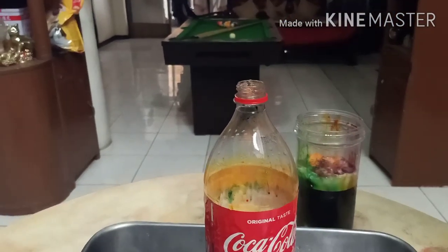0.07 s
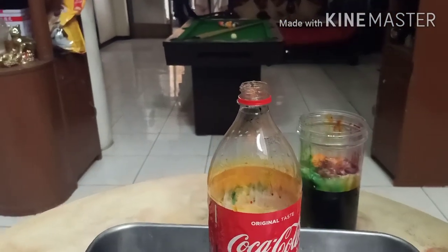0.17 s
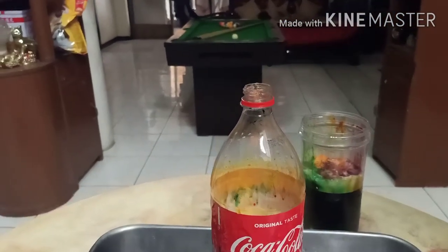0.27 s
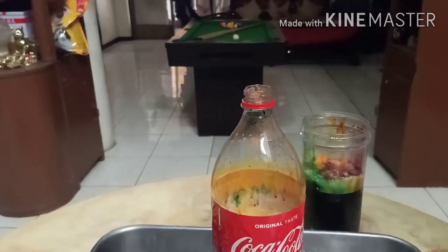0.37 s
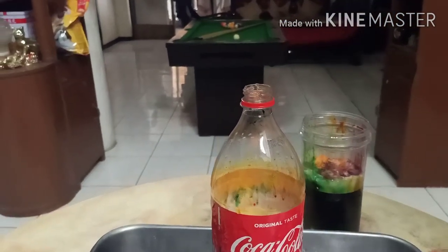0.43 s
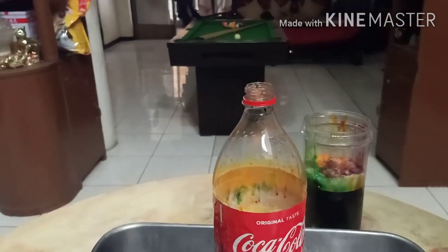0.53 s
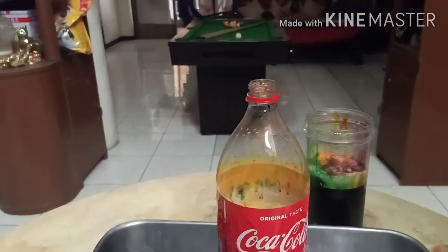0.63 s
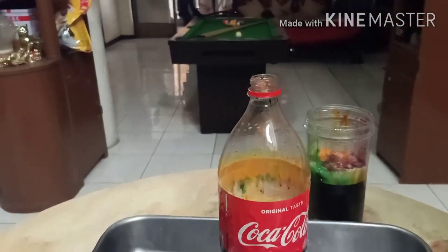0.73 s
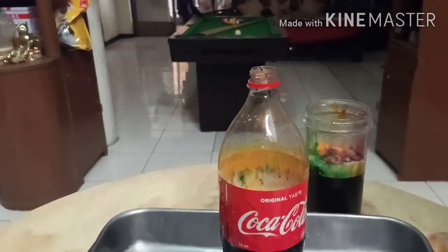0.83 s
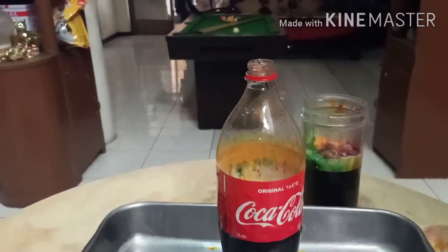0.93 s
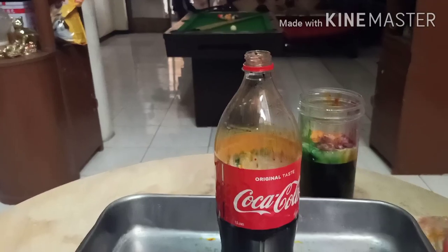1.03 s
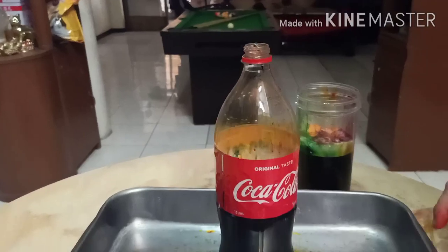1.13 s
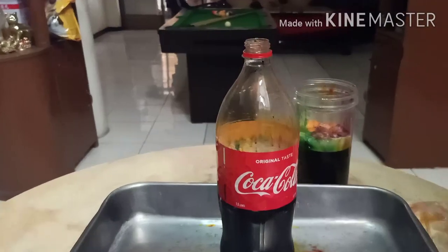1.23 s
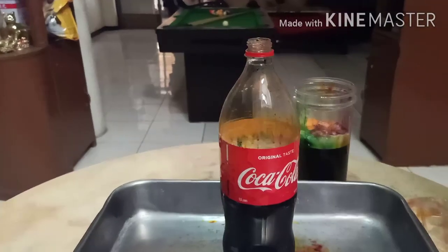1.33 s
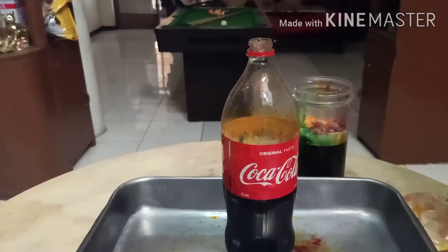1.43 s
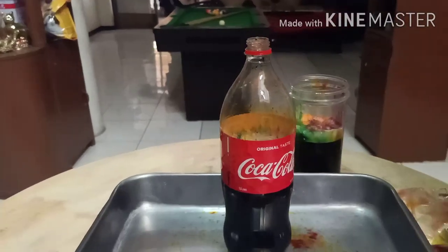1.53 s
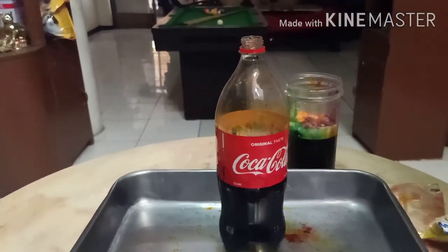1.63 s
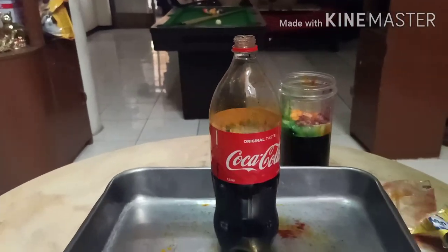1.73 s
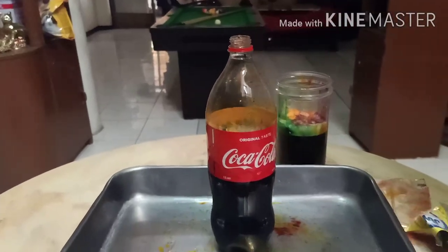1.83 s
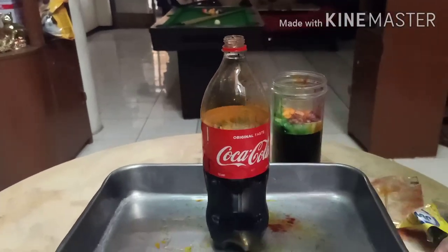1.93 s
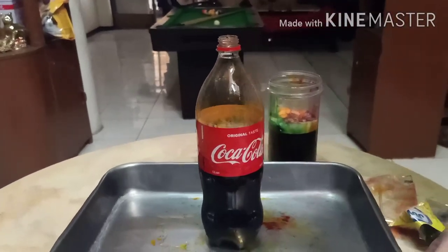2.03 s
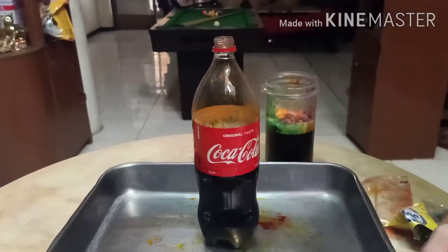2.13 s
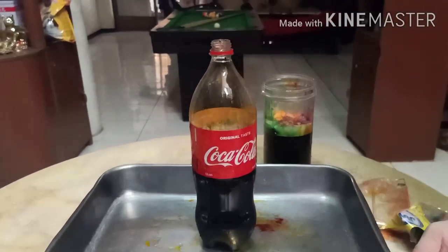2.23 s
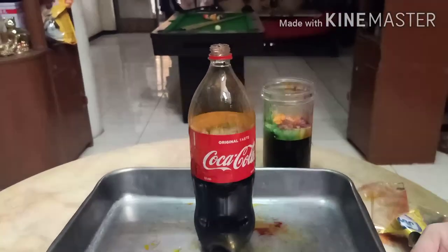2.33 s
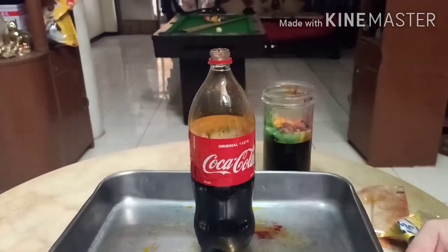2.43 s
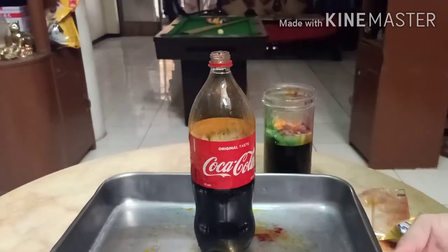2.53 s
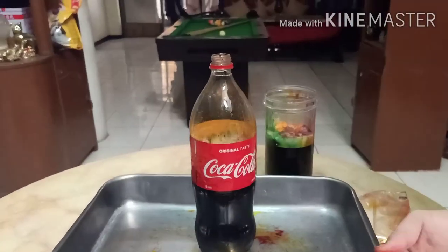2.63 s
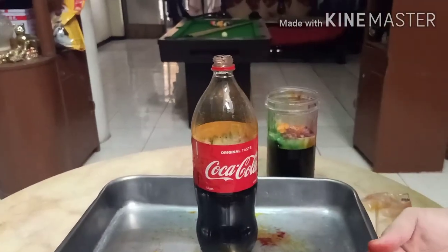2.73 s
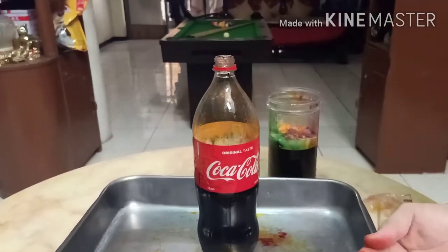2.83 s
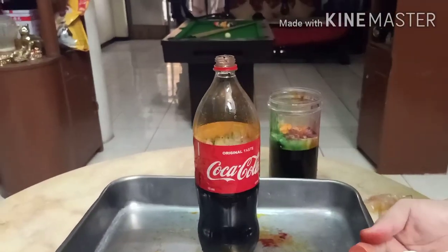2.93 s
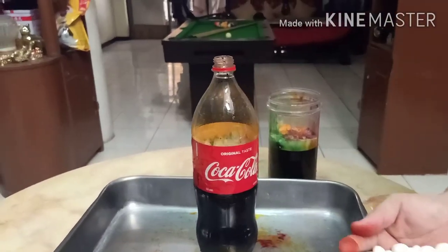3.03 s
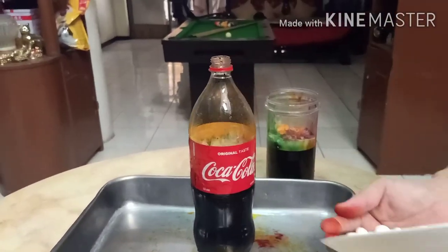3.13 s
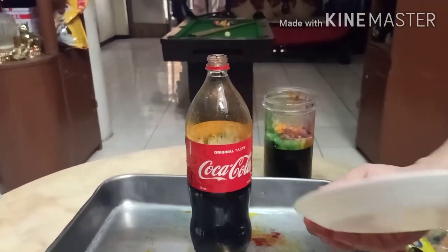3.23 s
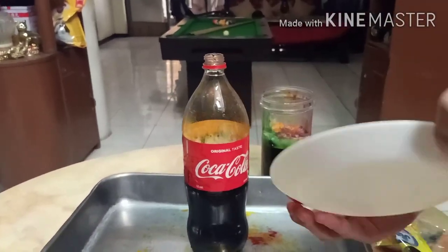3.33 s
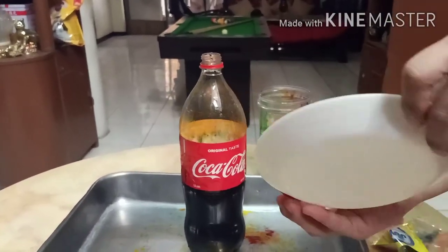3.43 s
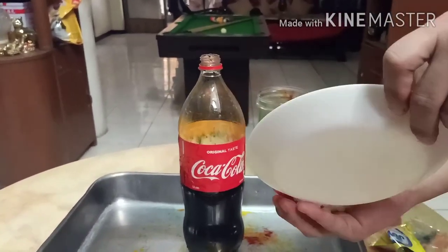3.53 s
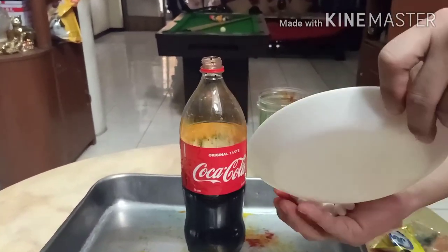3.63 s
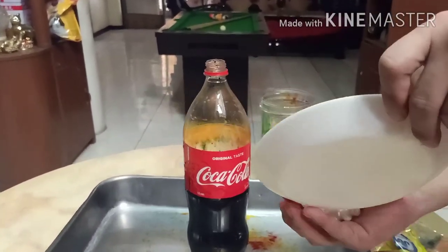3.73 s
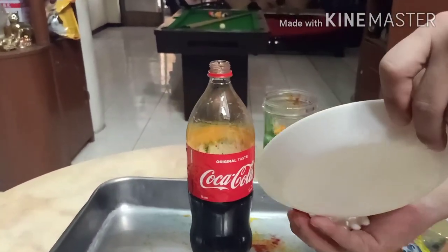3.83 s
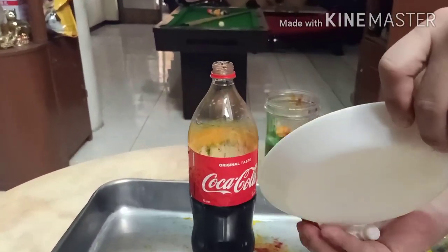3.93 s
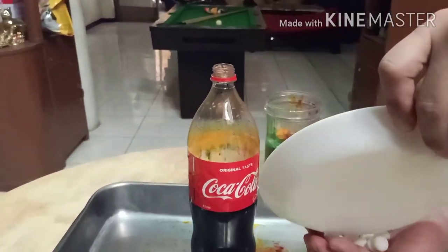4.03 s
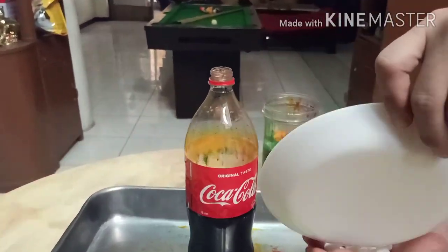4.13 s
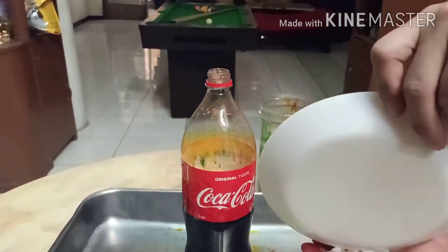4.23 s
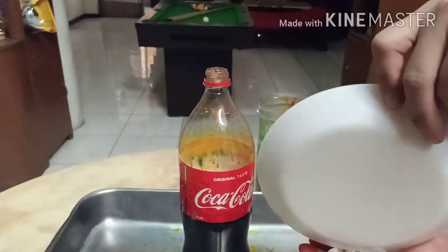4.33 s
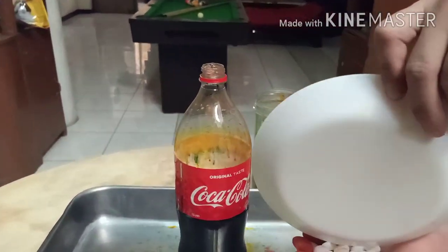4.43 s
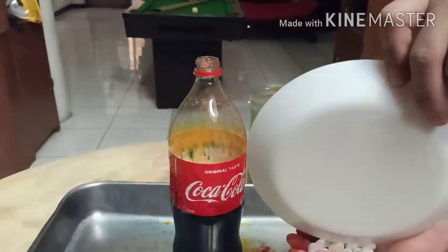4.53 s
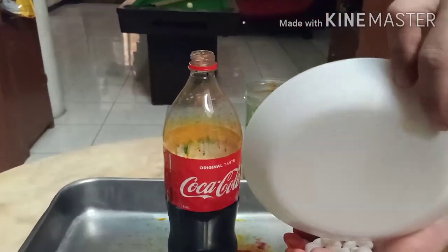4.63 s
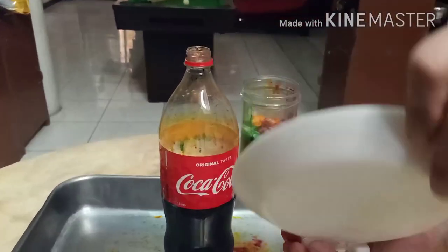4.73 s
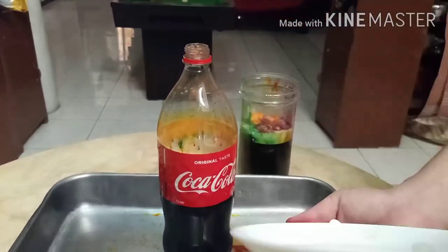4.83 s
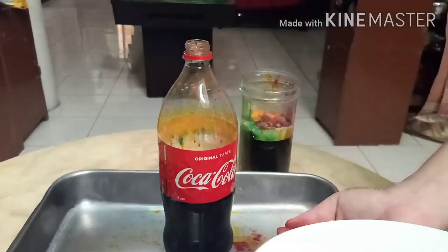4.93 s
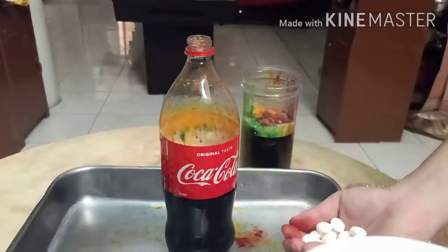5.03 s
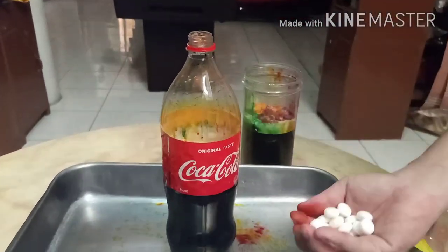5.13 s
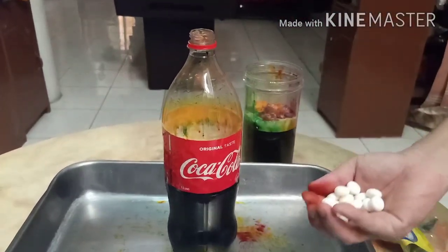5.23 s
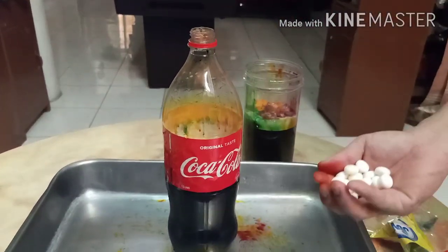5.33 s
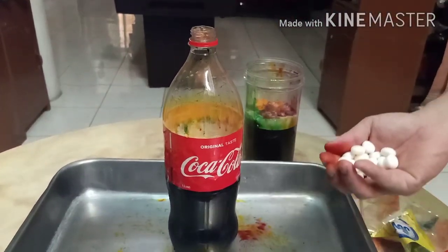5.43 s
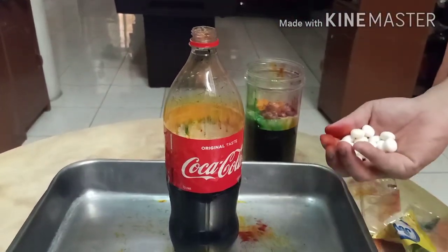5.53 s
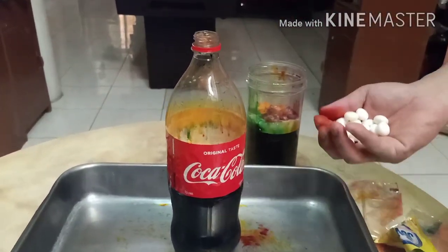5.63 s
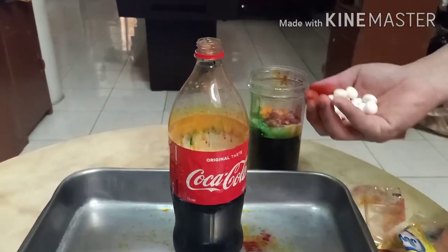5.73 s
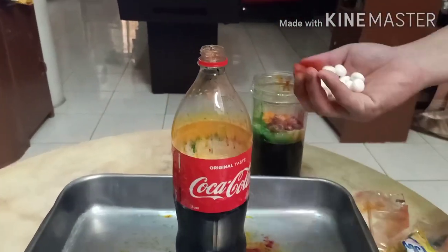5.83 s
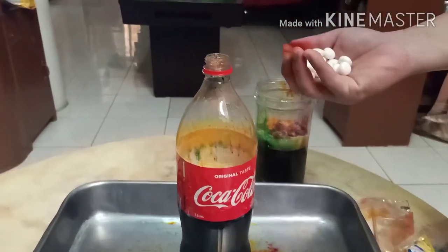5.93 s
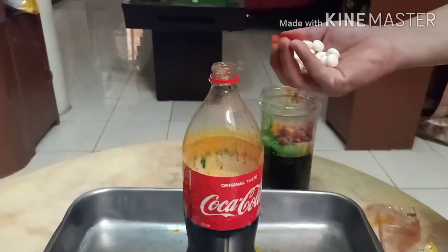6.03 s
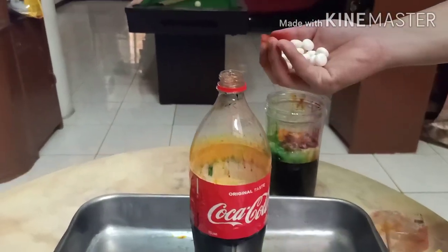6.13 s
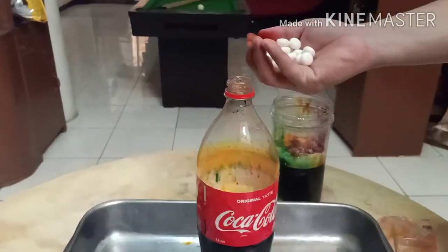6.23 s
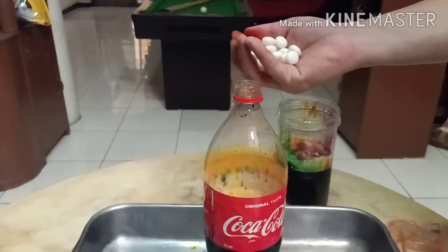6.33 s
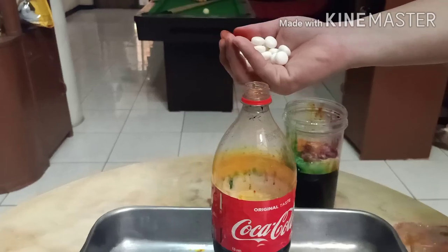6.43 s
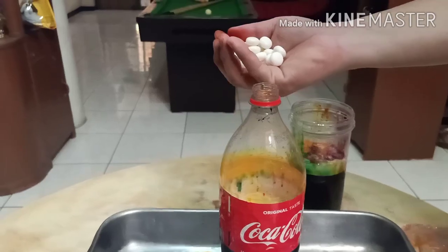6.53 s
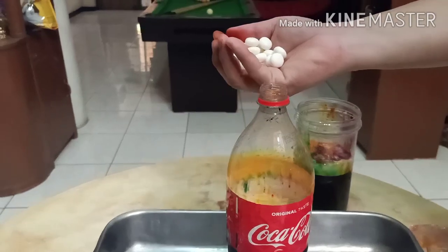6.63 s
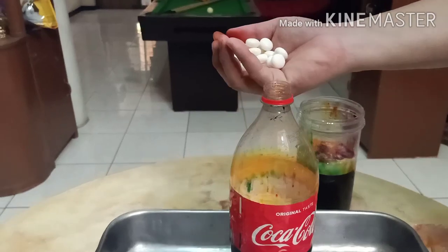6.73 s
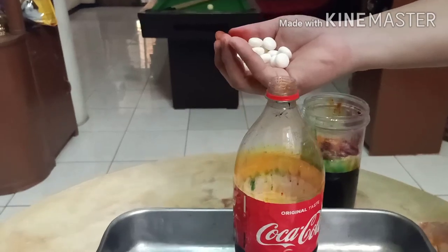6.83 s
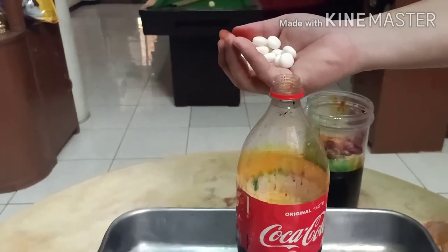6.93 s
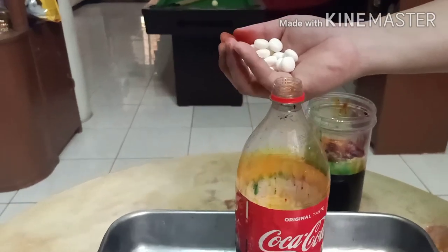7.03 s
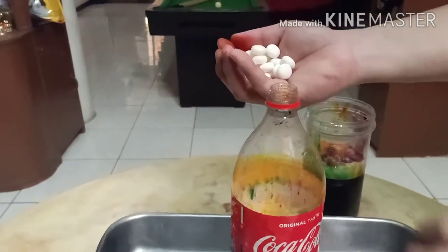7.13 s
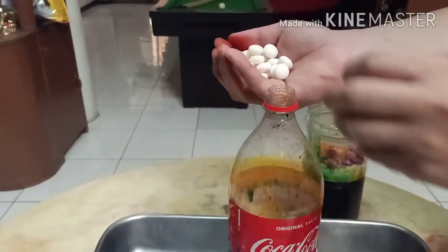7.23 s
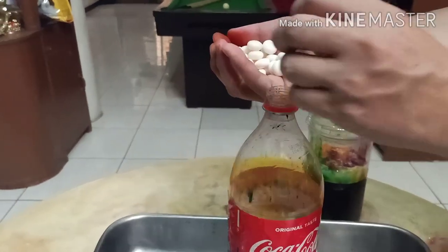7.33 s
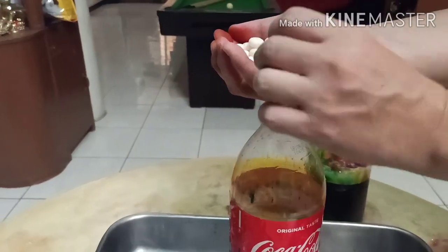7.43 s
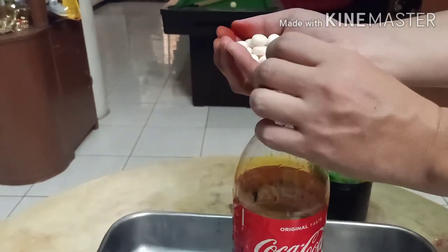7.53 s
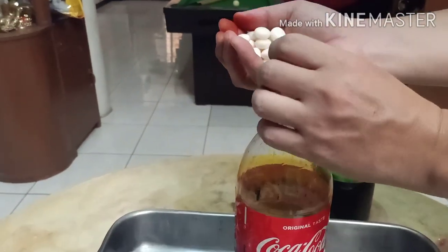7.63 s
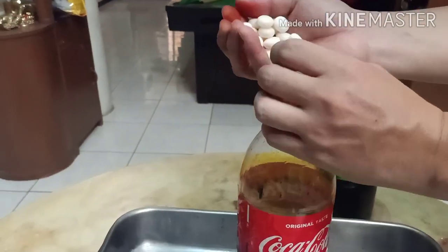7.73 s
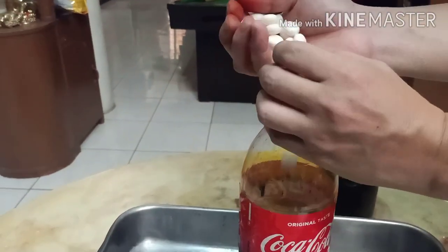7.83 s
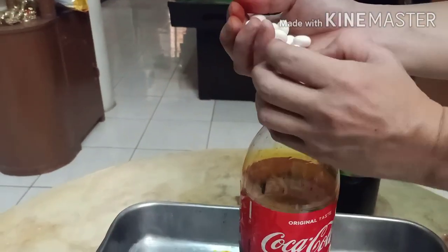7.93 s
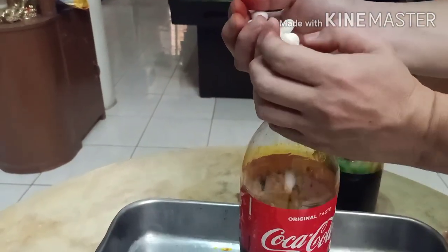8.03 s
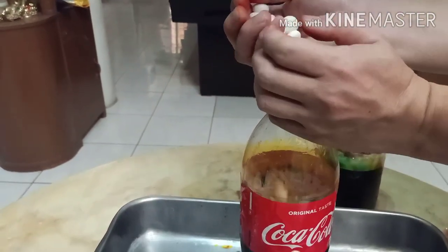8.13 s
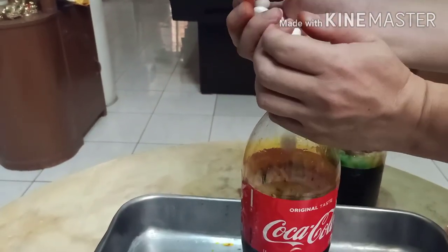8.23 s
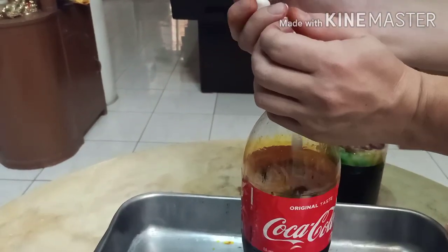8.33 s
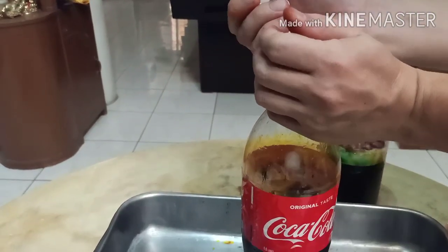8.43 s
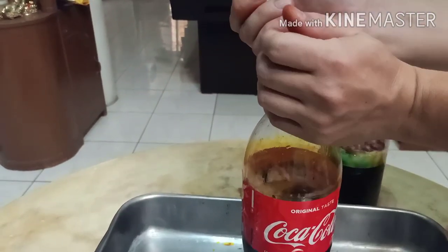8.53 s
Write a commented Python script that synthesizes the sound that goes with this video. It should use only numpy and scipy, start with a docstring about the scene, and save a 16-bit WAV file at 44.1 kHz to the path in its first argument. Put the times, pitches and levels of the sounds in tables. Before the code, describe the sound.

Quiet tiled room with faint air and low hum pulses. A plate scrapes and judders over a tabletop, its hard mints rolling in a dense bright clatter. They are tipped into a hand with sharp clinks; the plate is set down with one loud knock. After a pause, mints clack hollowly into a plastic soda bottle. Close stereo microphone, slightly dull treble.

```python
"""First a low hum swells in short bursts, then a plate of hard mints is drawn over a table.
The mints roll, clink and are tipped into a hand, and the plate is set down with a knock.
Then mints are fed into a plastic soda bottle: they clack on its neck and wall and plop into the soda.
Blows are sums of fading tones plus a burst of noise; rubbing and rolling are streams of tiny impacts.
A tiled room adds echoes and a tail; air noise, rumble, rustle and faint whistles lie behind."""
import sys
import numpy as np
from scipy import signal
from scipy.fft import rfft, irfft, next_fast_len
from scipy.io import wavfile
from scipy.ndimage import uniform_filter1d

SR = 44100
rng = np.random.default_rng(int(sys.argv[2]) if len(sys.argv) > 2 else 0)


def put_to_file(sound):
    """Save the sound as 16-bit audio at rate SR, in the file named by the first command-line argument."""
    columns = np.atleast_2d(sound).T  # one column per channel
    safe = np.clip(columns, -1, 1)
    whole_steps = np.round(safe * 32767)
    wavfile.write(sys.argv[1], SR, whole_steps.astype(np.int16))


N = 377937
TIME = np.arange(N) / SR  # seconds

# In all tables, a positive left-right value is louder on the left; spectrum levels are relative.

# A mint hits the plate: (time [s], peak level [dB], brightness [dB per octave],
# ring length [factor], contact point [0 middle - 1 edge])
CLINKS = [(2.258, -36.5, -2, 0.81, .1), (2.299, -30.5, -1, 0.62, 0.17), (2.304, -29, -0.5, 0.83, 0.39),
          (2.378, -14.5, 5, 2, 0), (2.463, -16, 6, 0.44, .1), (2.482, -37.5, -1.5, 1.1, 1),
          (2.490, -19.5, 1.5, 0.65, 0), (2.499, -15.5, 9.5, .51, 0.49), (2.5, -13.5, 4, 0.87, 0),
          (2.511, -16, 6, 0.66, 0.74), (2.516, -10, 18, 0.35, 0.056), (2.519, -20, 5.5, .4, .3),
          (2.523, -13, 9.5, 0.76, 0.78), (2.532, -13.5, 19, 1.4, 0), (2.561, -18.5, 5, .49, 0.48),
          (2.582, -22, 4.5, 0.81, 0), (2.593, -12.5, 7.5, .8, 0.043), (2.606, -16, 6.5, 0.87, 0),
          (2.626, -22, 3, 0.47, 0.43), (2.633, -18.5, 6.5, 0.54, .3), (2.673, -18.5, 7, 1.2, 0.13),
          (2.678, -19, 3, .9, 0.089), (2.694, -16, -1.5, 1.5, .2), (2.701, -15, 1.5, 1.1, 0.23),
          (2.711, -21.5, 4, .88, 0), (2.719, -13.5, 3, 0.98, 0.015), (2.739, -10, 10, 0.52, .1),
          (2.754, -16.5, 8, .6, 0.081), (2.763, -10.5, 8.5, 0.86, 0.42), (2.771, -13, 9, 0.68, 0),
          (2.783, -16, 3.5, .6, 0.67), (2.798, -11.5, 10.5, 0.55, 0.34), (2.8035, -9, 13.5, .7, 0.37),
          (2.811, -18, 9.5, 0.53, 0.45), (2.822, -21, 12, 0.83, .2), (2.838, -17.5, 2.5, 2.3, 0.28),
          (2.865, -21.5, 3, 0.96, .3), (3.085, -33, -3, 1.3, 0.13), (3.4923, -32, 11, 0.36, 0.34),
          (3.501, -24.5, -2.5, 0.49, 0.85), (3.516, -24, -0.5, 1.4, 0.84), (3.581, -29, 5, 0.36, 0.5),
          (3.607, -20, -3, 0.82, 0.77), (3.635, -19, .5, 0.6, 0.75), (3.661, -22.5, 4, 0.45, 0.52),
          (3.7, -26.5, -3, 1.4, 0.93), (3.784, -24, 5, 0.22, 0.89), (3.9135, -23.5, 12, .3, 0.77),
          (3.922, -13.5, 3, .5, .8), (3.944, -4.5, 4, 0.82, 0.84), (3.9637, -6, 2.5, 0.46, 0.87),
          (3.9675, -14.5, 1, .7, 0.023), (3.971, -13.5, 8.5, 0.67, 0.89), (4.037, -13.5, 7.5, 0.66, 0.89),
          (4.1005, -11.5, 4, .6, 1), (4.12, -29, -0.5, 0.35, 1), (4.175, -19, 1.5, .44, 0.47),
          (4.182, -19, -3, 0.63, 0.87), (4.282, -14, -2.5, 0.59, 0.98), (4.307, -28.5, -5.5, 1.7, 1),
          (4.594, -36.5, -8, 0.21, 0.45), (4.776, -13, 0.5, 1.1, 0.16), (4.7906, -21.5, 2.5, 0.58, 1)]
# The mints move from the left towards the centre as the plate is tipped: (time [s], left-right [dB])
MINTS_PLACE = [(2.3, 10.5), (2.9, 5), (3.6, 1), (3.95, 4), (4.299, 1), (4.8, 4)]
# Mints roll about as the plate is pulled: (time [s], level [dB])
ROLL_LEVEL = [(1.6, -74), (2.2, -64), (2.29, -48), (2.45, -36.5), (2.52, -37), (2.58, -36.5), (2.74, -34),
              (2.86, -43), (2.98, -61)]
# Mints slide off the lifted plate: (time [s], level [dB])
POUR_LEVEL = [(2.98, -64.5), (3.4, -66), (3.5, -50), (3.7, -42), (3.86, -53), (4.05, -68), (4.35, -56),
              (4.5, -77)]
# Tones the plate rings with: (frequency [Hz], level at point 0 [dB], level at point 1 [dB],
# time to fade by 60 dB at ring length 1 [s])
PLATE_MODES = [(622.6, -35, -52.5, 0.24), (1120, -26, -18, 0.024), (1649, -36, -18, 0.12),
               (2393, -32, -19, .08), (2818, -13, -10, 0.095), (2880, -24.5, -10.5, 0.091),
               (3197, -27, -19.5, 0.051), (4123, -18.5, -20, 0.058), (4440, -9.5, -27, 0.056),
               (5236, -14, -8, 0.038), (5534, -17.5, -10.5, 0.039), (5800, -14.5, -13.5, 0.018),
               (6428, -2.5, -4.5, 0.018), (6616, -4.5, -8, 0.04), (6718, 1, -14.5, .037),
               (6970, -5.5, -15, 0.015), (7350, -18, -22, .018), (7870, -11, -14, .023),
               (8470, -14, -33, 0.038), (9560, -12, -23.5, 0.016), (10830, -16.5, -30.5, 0.029),
               (12700, -23, -35.5, 0.03), (14220, -24, -35, .035), (14950, -26, -27.5, .02)]
# Noise burst as a mint meets the plate: (frequency [Hz], density [dB per Hz])
PLATE_CRACK = [(100, -28), (520, -21), (850, -9), (1150, -8), (3000, 4), (3750, -2.5), (4400, -1.5),
               (6800, -3.5), (8300, -10.5), (10000, -17), (15500, -32.5)]

# The plate is drawn over the tabletop: (time [s], level [dB])
SCRAPE_LEVEL = [(1.38, -67.5), (1.62, -57.5), (1.8, -53), (2.2, -60.5), (2.47, -41), (2.515, -29),
                (2.57, -42.5), (2.65, -41), (2.7, -37), (2.81, -35), (2.87, -46.5), (3.0, -54)]
# Spectrum of the scrape: (frequency [Hz], density [dB per Hz])
SCRAPE_COLOUR = [(150, -11.5), (480, -11.5), (780, 2.5), (1150, -1.5), (1600, 2.5), (2100, -1), (2600, 5),
                 (3800, -2), (4600, -3.5), (5800, -4.5), (7200, -8), (9000, -31.5), (15500, -26.5)]
# The plate's foot sticks and slips: (time [s], peak level of a slip [dB])
JUDDER = [(1.794, -32), (1.907, -43), (1.955, -31.5), (1.962, -37), (2.013, -41), (2.03, -36.5),
          (2.067, -40.5), (2.085, -45.5), (2.113, -42.5), (2.139, -46), (2.177, -43), (2.2, -42),
          (2.243, -33)]
# Fine slips ring the foot: (time [s], level [dB])
CREAK_LEVEL = [(1.4, -80), (1.62, -69), (1.75, -50), (1.88, -51.5), (1.95, -60), (2.2, -64.5),
               (2.35, -48.5), (2.45, -71.5)]
# Filter on the creak: (frequency [Hz], gain [dB])
CREAK_COLOUR = [(1400, 2.5), (3000, 12), (4500, -5.5), (7000, -16)]
# Tones of the plate's foot: (frequency [Hz], level at point 0 [dB], level at point 1 [dB],
# time to fade by 60 dB at ring length 1 [s])
FOOT_MODES = [(1360, -17.5, -21.5, 0.046), (2043, -15.5, -1, 0.012), (2873, -14.5, -14.5, 0.023),
              (3070, -16.5, -15, 0.013), (4450, -6, -3.5, 0.0205), (5480, -8, -11.5, 0.02),
              (6755, -8, -9.5, .021)]
# Every judder slip shares: left-right [dB], brightness [dB per octave], ring length factor, contact point
SLIP_PAN_DB, SLIP_BRIGHT, SLIP_LENGTH, SLIP_POINT = 9, 0.5, 0.81, 0.55

# A mint hits the bottle: (time [s], peak level [dB], left-right [dB], brightness [dB per octave],
# ring length [factor], contact point [0 neck - 1 wall])
DROPS = [(7.767, -12.5, 2, 1, 0.84, 0.075), (7.833, -26.5, -3, -6, 2, 1), (8.006, -21, -1, 2, 1.5, 0.088),
         (8.0265, -7, 1, 1.5, 1.13, 0.43), (8.033, -20.5, -2, -14.5, 1.8, 0.34),
         (8.074, -12, 6, 5.5, 1.1, 0.092), (8.1016, 0, 1.5, -1.5, 0.86, 0.12),
         (8.129, -15, 9, 3, 0.61, 0.24), (8.1393, -8, -1.5, 0, 0.95, 0.3),
         (8.154, -14.5, 1, -8, 0.44, 0.54), (8.227, -31, 10, 18, 0.94, .05),
         (8.2605, -14.5, -1, -5, .8, 0.35), (8.287, -12.5, 3, 5, 1.05, 0.8),
         (8.3165, -9.5, -4, 0.5, 0.51, 0.65), (8.328, -14, 1, -8, 1.1, 1), (8.351, -17.5, 16, 1, 0.66, 0.2),
         (8.364, -6, 5, 2.5, 0.7, 0.25), (8.372, -18, 0, -7, 1.8, 0.86),
         (8.390, -15.5, -5, -4.5, 0.45, 0.61), (8.410, -12, 10, 3, 1.15, 0.65),
         (8.542, -12, 4.5, 2, 0.53, 0.54), (8.556, -22.5, 1, 0, 3.3, 0.26)]
# Tones of the bottle: (frequency [Hz], level at point 0 [dB], level at point 1 [dB],
# time to fade by 60 dB at ring length 1 [s])
BOTTLE_MODES = [(697, -10.5, -7, 0.015), (1058, -3, -1, 0.011), (1205, -1.5, 0.5, .01),
                (1400, -7.5, -3, 0.015), (2076, 1.5, -1.5, 0.013), (2260, 5.5, -11, 0.02),
                (3220, -9, -22, .005), (3670, -15.5, -7, 0.0088), (4350, -20, -17.5, 0.011),
                (5000, -21.5, -21, 0.0049), (6160, -30, -32, .006)]
# Noise burst of a hit on the bottle: (frequency [Hz], density [dB per Hz])
BOTTLE_CRACK = [(60, -33), (400, -21.5), (800, -7.5), (2300, 2.5), (3300, -4), (5000, -7), (6800, -13.5),
                (8500, -28.5), (15500, -35)]
# Mints jostle in the bottle's mouth: (time [s], level [dB])
PATTER_LEVEL = [(7.98, -69), (8.04, -58), (8.15, -37.5), (8.24, -58), (8.33, -43), (8.42, -39), (8.5, -56),
                (8.57, -50)]
# Filter on the jostling: (frequency [Hz], gain [dB])
PATTER_COLOUR = [(600, -17.5), (2200, -8), (3300, 2), (6500, 6.5), (9000, -5)]
# Hollow thumps and plops as mints land in the soda: (time [s], peak level [dB],
# starting pitch [Hz], time to fade by 60 dB [s])
PLOPS = [(8.029, -45, 140, 0.27), (8.03, -24, 743, 0.058), (8.188, -44, 82.5, 0.21), (8.279, -48, 104, .15),
         (8.287, -41, 325.4, 0.36), (8.526, -44, 332, 0.57), (8.534, -44, 137, 0.26),
         (8.542, -14.5, 1390, 0.023)]
# A plop builds up over this many cycles; its pitch climbs by this share of itself each second
PLOP_RISE_CYCLES, PLOP_GLIDE_PER_S = 0.75, 0.16

# The plate is set down on the table: (time [s], peak level [dB], left-right [dB],
# brightness [dB per octave], ring length [factor], contact point [0-1])
KNOCKS = [(5.5108, -1, 1, 0.5, 0.45, 0.01), (5.7965, -11.5, 4.5, 2, 0.48, 1),
          (5.8122, -11.5, -0.5, 2.5, 0.26, 1), (5.818, -21, -1, -3, 2.1, 1)]
# Soft bumps further off: (time [s], peak level [dB], left-right [dB],
# brightness [dB per octave], ring length [factor], contact point [0-1])
BUMPS = [(1.4985, -26.5, -5, 0.5, .5, 0), (1.577, -41, 8, -3, 1, 1), (1.588, -39.5, 1, -8.5, 1.1, 0.6),
         (1.795, -33, 0, -3, 1.05, 0.5), (6.919, -28.5, 3, -0.5, 1.7, 1), (6.927, -33.5, 0, -3.5, 2.1, 1),
         (6.943, -24, 1, 4.5, 3.6, 0.95), (6.958, -27.5, 3, 4, 4.5, 1)]
# Tones of the tabletop: (frequency [Hz], level at point 0 [dB], level at point 1 [dB],
# time to fade by 60 dB at ring length 1 [s])
TABLE_MODES = [(80.4, -16.5, -22, 0.67), (141, -19, -27, 0.19), (207, -7.5, -13.5, 0.18),
               (292, -25, -9.5, 0.097), (513, -10.5, 3.5, 0.01), (595, -27.5, 3.5, 0.02),
               (950, -1.5, 8.5, 0.0071), (1260, 16, -9, 0.013), (1470, 1.5, -10.5, 0.013),
               (1630, -8, -17, 0.013), (2120, -16, -5, 0.024), (2910, -35, -21, 0.02),
               (4440, -28, -12, 0.014), (6700, -42, -10, 0.0081)]
# Noise burst of a blow on the table: (frequency [Hz], density [dB per Hz])
TABLE_CRACK = [(40, -37), (130, -29), (400, 7.5), (1200, 5), (2400, -2.5), (3600, -8.5), (7000, -18),
               (8500, -22), (15500, -50)]
# Spectrum of the flat first contact: (frequency [Hz], level [dB])
TABLE_SLAP = [(60, -30), (350, -8), (700, -4.5), (1150, 3.5), (1650, -5.5), (2400, -5), (3600, -27.5),
              (4600, -17.5), (5300, -40), (7000, -27), (9000, -51.5), (15500, -62)]
SLAP_DB, SLAP_FALL_DB = 6.5, 13.5  # strength of the slap at point 0, and its loss towards point 1

# Small dry ticks, such as mints meeting in the palm: (time [s], peak level [dB], left-right [dB],
# brightness [dB per octave], ring length [factor], contact point [0-1])
TICKS = [(1.0225, -40, 10.5, -5, 0.98, 1), (1.042, -26, 7, 12.5, 0.38, 0.57),
         (1.4465, -42, 9, -5, 1.2, 0.5), (1.457, -42.5, 1, -7, 1.1, 0.6),
         (1.527, -35.5, 7, -6.5, 0.54, 0.7), (6.4037, -28, 7.5, 3.5, 0.69, 0.3),
         (6.7764, -19.5, 6.5, 2.5, 0.73, 0.22), (8.061, -30, -3, 12, 0.68, 0.5),
         (8.244, -35, 7, 1, 0.46, 0.1), (8.281, -35, 0, 6, 0.48, 0.4), (8.402, -16.5, 1, -6, 0.82, 0)]
# Tones of a mint: (frequency [Hz], level at point 0 [dB], level at point 1 [dB],
# time to fade by 60 dB at ring length 1 [s])
MINT_MODES = [(2550, -12, 25, 0.035), (3400, -6, -6, 0.007), (4400, -48, 22, 0.018), (5100, -5, -34, 0.033),
              (6820, 8.5, -15.5, 0.027), (10340, -36, 15, 0.021), (14200, -36, 25, 0.034)]
# Fingers rub the mints together: (time of the peak [s], peak level [dB], rise [s], fall [s])
RUBS = [(1.09, -66.5, 0.18, 0.61), (3.79, -39, 0.051, 0.039), (7.94, -46, 0.066, 0.11),
        (8.42, -74, 0.38, 0.64)]
RUB_FADE_DB = -19.5  # change from the peak, one rise before it or one fall after it

# Spectrum of the room air: (frequency [Hz], density [dB per Hz])
AIR_COLOUR = [(25, -33.5), (40, -12), (90, -14), (130, -0.5), (180, -4), (300, -11.5), (450, -12.5),
              (900, -14.5), (1400, -18), (2200, -8), (2900, -16), (3900, -21.5), (7100, -25.5), (8000, -39),
              (16000, -35.5)]
# Loudness of the room air: (time [s], level [dB])
AIR_LEVEL = [(0, -58.5), (1.3, -57), (1.7, -55), (3.2, -53.5), (5.3, -55.5), (6.1, -53.5), (7.2, -52),
             (7.6, -56.5), (8.57, -44)]
# A dull rumble swells: (time [s], level [dB])
RUMBLE_LEVEL = [(0, -60.5), (1.4, -70), (2.4, -85), (3.0, -58.5), (3.8, -51.5), (4.5, -47.5), (5.0, -49.5),
                (5.4, -53.5), (6.1, -51.5), (6.6, -52), (7.4, -55.5), (8.57, -56)]
# Spectrum of the rumble: (frequency [Hz], density [dB per Hz])
RUMBLE_COLOUR = [(25, -30.5), (55, -9.5), (75, -5), (100, -3), (135, 4), (230, -7.5), (330, -6.5),
                 (420, -12.5), (540, -23), (1000, -28.5), (3000, -49)]
# A soft, low rustle while the plate is lifted: (time [s], level [dB])
RUSTLE_LEVEL = [(2.7, -69), (3.1, -55), (3.5, -53.5), (3.85, -48.5), (4.3, -56.5), (4.7, -74.5), (5.3, -62)]
# Spectrum of the rustle: (frequency [Hz], density [dB per Hz])
RUSTLE_COLOUR = [(60, -32.5), (170, -15), (260, -2), (330, 0), (410, -5), (520, -18.5), (1000, -32.5),
                 (3000, -56)]
# The steady part of the low hum: (time [s], level [dB])
HUM_LEVEL = [(0, -78), (2.3, -70.5), (2.8, -57.5), (3.8, -68)]
# The hum swells briefly: (time of the peak [s], level [dB], half length [s])
HUM_SWELLS = [(0.085, -61, 0.019), (0.177, -53, 0.05), (.49, -54, 0.04), (0.737, -47, 0.036),
              (0.905, -55.5, 0.019), (1.154, -49, 0.02), (1.4, -54, 0.017), (1.92, -59, 0.03),
              (2.075, -57, 0.017), (2.18, -53.5, 0.014), (2.602, -54, 0.029), (2.767, -51, 0.037),
              (3.029, -60, .05), (3.27, -50.5, 0.058)]
HUM_HZ, HUM_WANDER_HZ = 131.2, 4.15
# A deep tone in the rumble: (time [s], level [dB])
DRONE_LEVEL = [(4.0, -74), (4.35, -55), (4.58, -47.5), (4.75, -59), (4.9, -58), (5.1, -68)]
# A faint thin tone: (time [s], level [dB])
WHINE_LEVEL = [(4.2, -90), (4.45, -74), (5.0, -78.5), (5.45, -74.5), (5.6, -76)]
# A brief faint whistle: (time [s], level [dB])
CHIRP_LEVEL = [(.95, -71), (1.05, -63), (1.2, -68), (1.28, -70)]

# How long the room's tail lasts: (frequency [Hz], time to fade by 60 dB [s])
ROOM_FADE = [(120, 1), (400, 0.55), (1000, 0.72), (2700, 0.86), (7000, 0.55), (14000, 0.26)]
# Single echoes off floor, ceiling and walls: (delay [ms], relative level [dB])
ECHOES = [(12.5, -11), (18, -21.5), (23.5, -16), (26.5, -22), (30, -11)]
# How alike sound from all sides is at the two microphones: (frequency [Hz], correlation [0-1])
LIKENESS = [(100, 0.95), (300, 0.92), (700, 0.49), (1500, 0.03), (4000, .05)]
EDGE_HZ = 15800  # upper limit of the microphone


def plate():
    """Mints clink on the plate and chatter over it; each contact point rings its own mix of tones."""
    def clink(length, point):
        ring = blow(PLATE_MODES, PLATE_CRACK, crack_db=-9.5, crack_t60=0.027, length=length, point=point,
                    scatter_db=4.5, port_spread=4.1)
        return ring + amp(-15.5) * snap(PLATE_CRACK)

    def graze(length, point):
        return blow(PLATE_MODES, PLATE_CRACK, crack_db=-6.0, crack_t60=0.01, length=length, point=point,
                    scatter_db=4.5, port_spread=2.2, detune=0.0082, size=4096)

    clinks = blows(clink_rows(), clink, pivot_hz=4740, lead_ms=0.16)
    rolling = chatter(lambda: graze(length=0.58, point=0.2), per_s=33, spread_db=3.5, count=8)
    roll = rolling * level(ROLL_LEVEL) * amp([[6.0], [-2.0]])  # gains in dB: left, right
    sliding = chatter(lambda: graze(length=0.6, point=1.0), per_s=330, spread_db=9.5)
    pour = sliding * level(POUR_LEVEL) * amp([[5.0], [1.5]])
    return room(clinks + roll + pour, wet_db=-14.0, near_db=-10.0, echo_db=-7)


def clink_rows():
    """Each clink takes its side from where the mints lie."""
    at, pan_db = np.transpose(MINTS_PLACE)
    return [(s, db, np.interp(s, at, pan_db), bright, length, point)
            for s, db, bright, length, point in CLINKS]


def foot():
    """The plate's foot ring scrapes over the tabletop in fine grains, and creaks and judders as it slips."""
    def slip(length, point):
        return blow(FOOT_MODES, PLATE_CRACK, crack_db=-16.5, crack_t60=0.015, length=length, point=point,
                    detune=0.008, contact_s=0.003, size=4096)

    grit = friction(SCRAPE_COLOUR, per_s=330, spread_db=3.0)
    grit = patchy(grit, depth_db=3.5, patch_s=0.02, patch_hz=500)
    scrape = grit * level(SCRAPE_LEVEL) * waver(depth_db=2.0, rate_hz=150) * amp([[2.5], [-1.5]])
    judder = blows(slip_rows(), slip, pivot_hz=4530, lead_ms=0.23)
    fine_slips = chatter(lambda: slip(length=0.3, point=0.66), per_s=35, spread_db=2.5, count=6)
    creak = unit(colour(fine_slips, CREAK_COLOUR)) * level(CREAK_LEVEL) * amp([[2.5], [-2.5]])
    return room(scrape + judder + creak, wet_db=-12.0, near_db=-12, echo_db=-13.5)


def slip_rows():
    """Stick and slip: small, alike blows on the foot ring."""
    return [(s, db, SLIP_PAN_DB, SLIP_BRIGHT, SLIP_LENGTH, SLIP_POINT) for s, db in JUDDER]


def bottle():
    """Mints jostle in the mouth, knock short hollow clacks from the plastic, then plop into the soda."""
    def clack(length, point):
        ring = blow(BOTTLE_MODES, BOTTLE_CRACK, crack_db=-6, crack_t60=0.026, length=length, point=point,
                    scatter_db=2.5, port_spread=0.72, detune=0.025, contact_s=0.0004, size=6144)
        return ring + amp(-13.5) * snap(BOTTLE_CRACK, size=6144)

    clacks = blows(DROPS, clack, pivot_hz=2050, lead_ms=0.022)
    # the small, yielding shell gives little bass or top
    shell = [(150, -5.5), (480, -7), (760, 0.5), (2300, -1.5), (3300, 0.0), (6800, -3.0), (9000, -11),
             (15000, -4)]
    soft = colour(clacks, shell)
    jostle = chatter(lambda: clack(length=0.5, point=0.3), per_s=45, spread_db=2.5)
    patter = unit(colour(jostle, PATTER_COLOUR)) * level(PATTER_LEVEL)
    knocking = room(soft + patter, wet_db=-10.0, near_db=-15.5, echo_db=-5)
    return knocking + room(plops(), wet_db=-13, near_db=-18, echo_db=-4)


def plops(size=16384):
    """The soda and the air above it ring briefly, rising a little in pitch."""
    t, out = np.arange(size) / SR, np.zeros((2, N))
    for s, db, hz, t60 in PLOPS:
        turns = hz * t * (1 + PLOP_GLIDE_PER_S * t / 2)
        rise = 1 - np.exp(-turns / PLOP_RISE_CYCLES)
        ring = np.sin(2 * np.pi * turns) * rise * np.exp(-np.log(1000) * t / t60)
        add(out, s, amp(db) * np.array([ring, ring]) / abs(ring).max())
    return out


def table():
    """Knocks on the tabletop, a sharp slap and then a dull ring; softer bumps further off."""
    def knock(length, point):
        ring = blow(TABLE_MODES, TABLE_CRACK, crack_db=0.0, crack_t60=0.075, length=length, point=point,
                    scatter_db=2.5, port_spread=0.28, contact_s=0.0001)
        return ring + amp(SLAP_DB - SLAP_FALL_DB * point) * snap(TABLE_SLAP)

    radiation = [(45, -8.5), (110, 6.0), (7000, 0.0), (10000, -9.5)]  # the top radiates little deep bass
    far_off = [(60, -17), (230, 3), (480, 0.5), (1600, 0), (2700, -3), (4000, -7), (10000, -5)]
    knocks = colour(blows(KNOCKS, knock, pivot_hz=1140, lead_ms=0.2), radiation)
    bumps = colour(blows(BUMPS, knock, pivot_hz=1202, lead_ms=0.27), far_off)
    near = room(knocks, wet_db=-10.5, near_db=-15.0, echo_db=-5, near_t60=0.13)
    return near + room(bumps, wet_db=-9.0, near_db=-6.5, echo_db=-1, near_t60=0.024)


def hand():
    """Dry ticks, and rubs of mints between the fingers that swell and fade."""
    def tick(length, point):
        return blow(MINT_MODES, PLATE_CRACK, crack_db=2.5, crack_t60=0.048, length=length, point=point)

    ticks = blows(TICKS, tick, pivot_hz=4470, lead_ms=0.096)
    pressure = np.zeros(N)
    for s, db, rise, fall in RUBS:
        distance = np.maximum((s - TIME) / rise, (TIME - s) / fall)
        pressure += amp(db + RUB_FADE_DB * distance)
    rub_colour = [(300, -26.5), (2000, -7.0), (6500, 4.0), (9000, -4.0), (11000, -7.5), (15000, -25.5)]
    rub = friction(rub_colour, per_s=290, spread_db=4.5) * pressure
    return room(ticks + rub, wet_db=-8.5, near_db=-16.0, echo_db=-13)


def background():
    """Flickering room air, an uneven hum, a swelling rumble, a soft rustle and faint whistles."""
    air = patchy(noise(AIR_COLOUR), depth_db=2.7, patch_s=0.046, patch_hz=249) * level(AIR_LEVEL)
    rumble = patchy(noise(RUMBLE_COLOUR), depth_db=5, patch_s=0.11, patch_hz=68.9) * level(RUMBLE_LEVEL)
    rustle = patchy(noise(RUSTLE_COLOUR), depth_db=3.5, patch_s=0.07, patch_hz=70) * level(RUSTLE_LEVEL)
    swells = sum(amp(db) * np.exp(-((TIME - s) / half) ** 2) for s, db, half in HUM_SWELLS)
    hum = tone(HUM_HZ, HUM_WANDER_HZ) * (level(HUM_LEVEL) + swells)
    drone = tone(74, 1.4) * level(DRONE_LEVEL)
    whine = tone(4310, 13) * level(WHINE_LEVEL) * waver(depth_db=6.0, rate_hz=25)
    chirp = tone(1910, 20) * level(CHIRP_LEVEL)
    return air + rumble + rustle + hum + drone + whine + chirp


def room(x, wet_db, near_db, echo_db, near_t60=0.09, build_s=0.0029):
    """Adds quick scattered reflections, single echoes off the walls, then the tail of the tiled room."""
    t = np.arange(SR) / SR
    hz, at, z = signal.stft(diffuse(rng.standard_normal((2, SR))), SR, nperseg=256)
    fade = amp(-60 * at / read(ROOM_FADE, hz)[:, None])  # each pitch fades at its own pace
    tail = signal.istft(z * fade, SR, nperseg=256)[1][:, :SR]
    tail = tail * (1 - np.exp(-t / build_s))
    sparse = rng.standard_normal((2, SR)) * (rng.random((2, SR)) < 0.03)
    near = diffuse(sparse) * amp(-60 * t / near_t60) * (t > 0.0015)
    echo = (amp(wet_db) * unit(tail) + amp(near_db) * unit(near)) / np.sqrt(SR)
    for ms, db in ECHOES:
        arrival = round(ms * SR / 1000) + rng.integers(-8, 9, 2)  # slightly apart left and right
        echo[[0, 1], arrival] += amp(db + echo_db)
    return x + signal.fftconvolve(x, echo, axes=1)[:, :N]


def blow(modes, crack, crack_db, crack_t60, length, point, scatter_db=2, port_spread=0.45,
         detune=0.0011, contact_s=0.0005, size=8192):
    """One blow: the contact point sets the strength of each fading tone, over a brief crack of noise."""
    t = np.arange(size) / SR
    hz, first_db, second_db, t60 = np.transpose(modes)
    length, point = np.clip(length, 0.3, 3), np.clip(point, 0, 1)
    weight, shift, port = rng.standard_normal((3, len(modes)))  # small differences between blows
    db = (1 - point) * first_db + point * second_db + scatter_db * weight
    port_phase = port * port_spread * np.sqrt(hz / hz.mean())
    phase = np.pi * np.arange(len(modes)) + np.array([[0], [1]]) * port_phase
    turn = 2j * np.pi * hz * (1 + detune * shift)
    decay = np.log(1000) / (t60 * length)
    steps = np.vander(np.exp((turn - decay) / SR), size, increasing=True)  # each tone, sample by sample
    ring = np.einsum("cm,mt->ct", amp(db) * np.exp(1j * phase), steps).imag
    press = 1 - np.exp(-t / contact_s)  # the force builds up as the surfaces meet
    burst = diffuse(rng.standard_normal((2, size))) * amp(-60 * t / (crack_t60 * length))
    return unit(ring * press) + amp(crack_db) * unit(colour(burst, crack))


def snap(spectrum, size=8192):
    """One clean push of a contact, alike at both microphones."""
    return unit(colour(signal.unit_impulse(size)[None], spectrum))


def blows(rows, voice, pivot_hz, lead_ms, count=88):
    """Plays a table of blows, each tilted in brightness around pivot_hz; the left hears them first."""
    out = np.zeros((2, N))
    for s, db, pan_db, bright, length, point in rows:
        tilt = [(pivot_hz / 4, -2 * bright), (pivot_hz * 2, bright)]
        hit = colour(voice(length, point), tilt)
        # the strongest short stretch (count samples) sets the peak
        crest = 2 * np.sqrt(uniform_filter1d(hit ** 2, count).max(axis=1, keepdims=True))
        add(out, s, hit / crest * amp([[db + pan_db / 2], [db - pan_db / 2]]))
    late_right = np.interp(TIME - lead_ms / 1000, TIME, out[1])
    return np.array([out[0], late_right])


def grains(per_s, spread_db):
    """Random tiny impacts, mostly weak, at an even mean power."""
    chance, strength = rng.random(N), rng.exponential(1, N)
    at, clicks = np.flatnonzero(chance < per_s / SR), np.zeros(N)
    clicks[at] = amp(spread_db * np.minimum(strength[at], 3)) * (-1) ** at
    return clicks / np.sqrt(np.abs(uniform_filter1d(clicks ** 2, size=2000)) + 1e-4)


def chatter(voice, per_s, spread_db, count=4):
    """Many tiny impacts, each ringing one of a few variants of a blow."""
    streams = (signal.oaconvolve(grains(per_s, spread_db)[None], voice(), axes=1)[:, :N]
               for _ in range(count))
    return unit(sum(streams))


def friction(spectrum, per_s, spread_db):
    """Rubbing: a dense stream of tiny slips."""
    slips = np.array([grains(per_s, spread_db), grains(per_s, spread_db)])
    return unit(colour(diffuse(slips), spectrum))


def noise(spectrum):
    """Steady noise from all sides, of rms 1."""
    return unit(colour(diffuse(rng.standard_normal((2, N))), spectrum))


def tone(hz, width_hz):
    """A tone whose pitch wanders at random by about width_hz."""
    smooth = uniform_filter1d(rng.standard_normal(N), size=1200)
    wander = unit(uniform_filter1d(smooth, size=1200))
    return unit(np.sin(2 * np.pi * np.cumsum(hz + width_hz * wander) / SR))


def waver(depth_db, rate_hz):
    """A random gain that varies up to about rate_hz."""
    size = next_fast_len(N)
    hz = np.fft.rfftfreq(size, 1 / SR)
    drift = irfft(rfft(rng.standard_normal(size)) * np.exp(-(hz / rate_hz) ** 2), size)[:N]
    return amp(depth_db * unit(drift))


def patchy(x, depth_db, patch_s, patch_hz, size=1024):
    """Lets small patches of time and frequency swell and sink at random."""
    overlap = size * 3 // 4
    z = signal.stft(x, nperseg=size, noverlap=overlap)[2]
    across = np.fft.fftfreq(z.shape[1], SR / size)[:, None] * patch_hz
    along = np.fft.fftfreq(z.shape[2], size / 4 / SR) * patch_s
    blur = np.exp(-2 * (across ** 2 + along ** 2))
    field = np.fft.ifft2(np.fft.fft2(rng.standard_normal(z.shape[1:])) * blur).real
    swollen = z * amp(depth_db * unit(field))
    return unit(signal.istft(swollen, nperseg=size, noverlap=overlap)[1][:, :N])


def diffuse(x):
    """Sound from all sides: alike at both microphones in the bass, nearly unrelated in the treble."""
    size = next_fast_len(x.shape[1])
    a, b = rfft(x, size)
    same = np.clip(read(LIKENESS, np.fft.rfftfreq(size, 1 / SR)), 0, 1)
    return irfft(np.array([a, same * a + np.sqrt(1 - same ** 2) * b]), size)[:, :x.shape[1]]


def colour(x, spectrum, size=2048):
    """Filters with the given spectrum, without sounding ahead of its input."""
    log_gain = np.log(amp(read(spectrum, abs(np.fft.fftfreq(size, 1 / SR)))))
    taps = np.fft.ifft(np.exp(np.conj(signal.hilbert(log_gain)))).real  # minimum phase
    return signal.oaconvolve(x, taps[None], axes=1)[:, :x.shape[1]]


def level(curve):
    """Gain over time from (time [s], level [dB]) rows, practically silent outside them."""
    s, db = np.transpose(curve)
    return amp(np.interp(TIME, s, db, left=-120, right=-120))


def add(mix, s, sound):
    """Mixes a stereo sound in at time s."""
    part = mix[:, max(round(s * SR), 0):][:, :sound.shape[1]]
    part += sound[:, :part.shape[1]]


def read(points, hz):
    """Reads a table on a log-frequency axis."""
    f, value = np.transpose(points)
    return np.interp(np.log(hz + 1), np.log(f + 1), value)


def amp(db):
    """Decibels to gain."""
    return np.exp(np.asarray(db) * (np.log(10) / 20))


def unit(x):
    """Scales to rms 1."""
    return x / np.sqrt(np.mean(x ** 2) + 1e-20)


def scene():
    """All sources at the two microphones."""
    return plate() + foot() + bottle() + table() + hand() + background()


def record(dry):
    """The microphone drops the deep bass, dulls the treble, clips at full scale and is band limited."""
    thin = signal.sosfilt(signal.butter(2, 45, "highpass", fs=SR, output="sos"), dry)
    response = [(60, -1.0), (1000, -2.0), (7200, 0.0), (9000, -11.5), (15000, -13.5)]
    heard = np.clip(colour(thin, response), -1, 1)
    band = signal.firwin(511, EDGE_HZ, window=("kaiser", 9), fs=SR)
    return signal.oaconvolve(heard, band[None], "same")


dry = scene()
out = record(dry)
put_to_file(out)
```